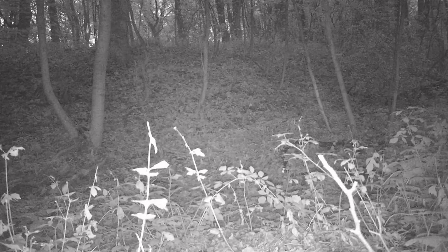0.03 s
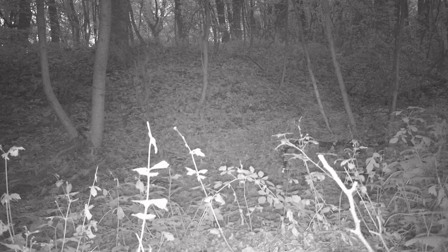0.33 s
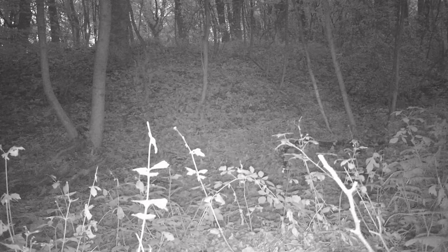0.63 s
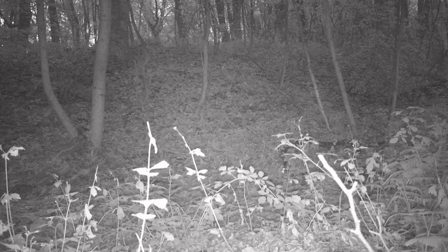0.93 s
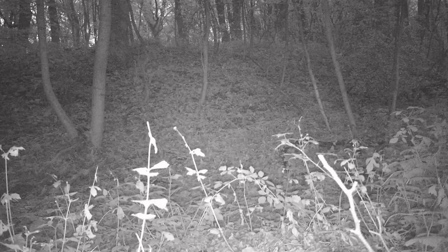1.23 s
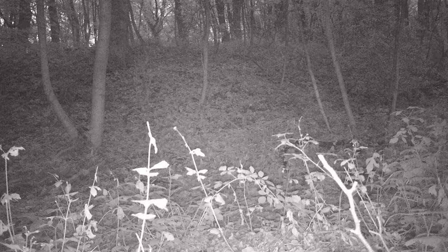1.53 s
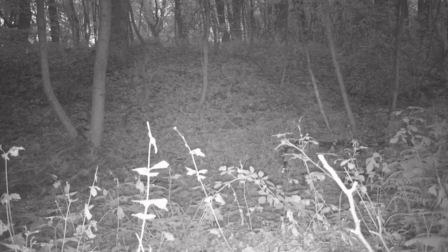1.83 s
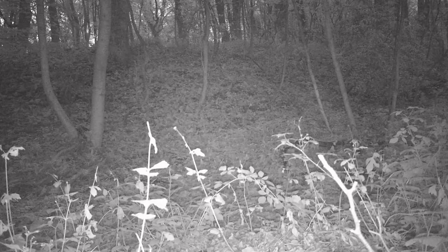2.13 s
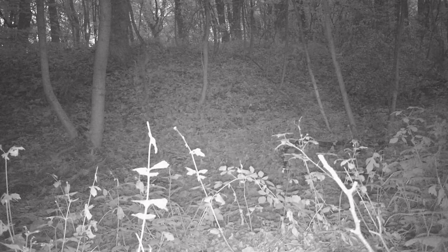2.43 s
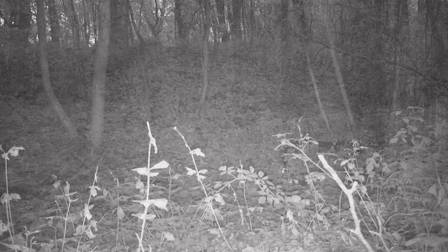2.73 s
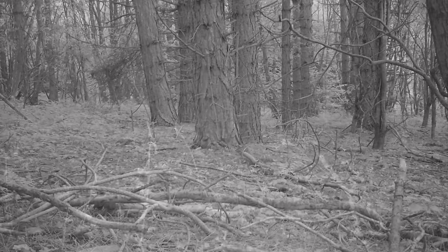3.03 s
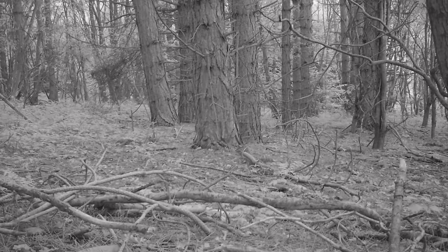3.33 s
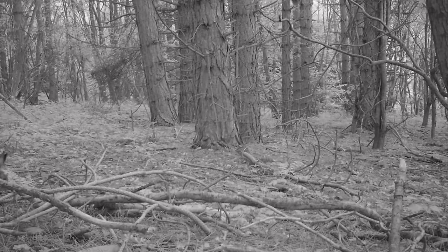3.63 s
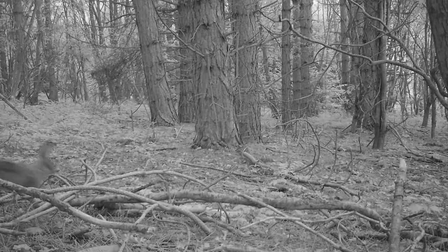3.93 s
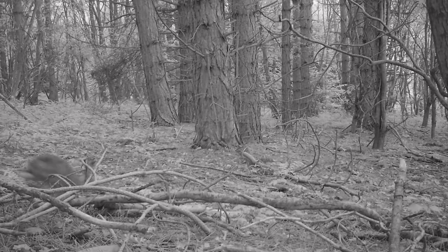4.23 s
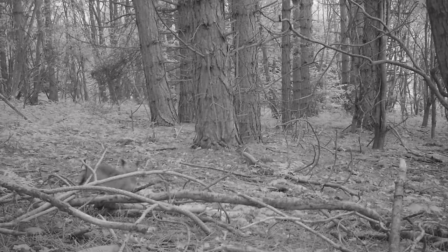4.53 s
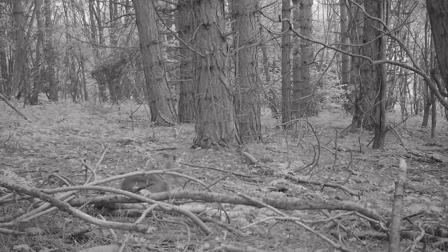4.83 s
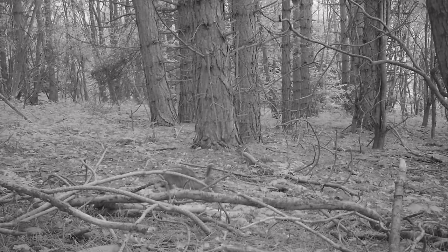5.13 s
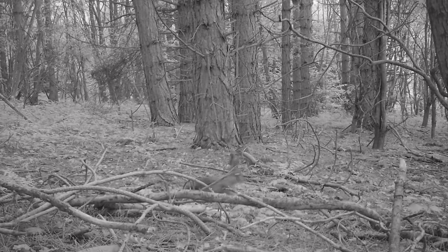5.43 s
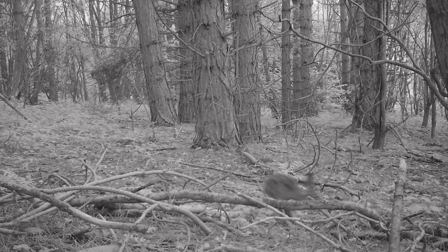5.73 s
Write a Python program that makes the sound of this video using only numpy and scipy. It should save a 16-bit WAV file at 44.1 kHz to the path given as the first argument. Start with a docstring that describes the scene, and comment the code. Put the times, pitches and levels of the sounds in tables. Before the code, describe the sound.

Steady dull microphone hiss and low woodland air rumble with a faint electronic throb, broken by one click before distant road noise joins.

```python
"""A trail camera in the woods

Microphone hiss lies over a low rumble of air while the camera's electronics throb and chirr five times
a second. Two scenes play, overlapping for a moment. The first has a soft sighing and one low bump.
The second switches on with a jump in voltage, heard as a click, and adds the roar of a far road.
The camera's filters make it all sound hollow and dull."""
import sys
import numpy as np
from scipy import signal
from scipy.fft import rfft, irfft
from scipy.io import wavfile
from scipy.ndimage import uniform_filter1d

SR = 44100
rng = np.random.default_rng(int(sys.argv[2]) if len(sys.argv) > 2 else 0)


def output_pcm(signal):
    """Save a mono or channel-first signal as 16-bit PCM at the path in sys.argv[1].

    Samples are clipped to [-1, 1] before scaling.
    """
    pcm = np.clip(np.atleast_2d(signal).T, -1, 1) * 32767
    wavfile.write(sys.argv[1], SR, np.round(pcm).astype(np.int16))


N = 258867
SECOND_START_S, FIRST_END_S = 2.3463, 4.0463

# Air rumbling among the trees. Each row: frequency in Hz, starting level in dB per Hz.
AIR_SPECTRUM = [(4, -71), (16, -62), (30, -67.5), (55, -78.5), (80, -81.5), (110, -86), (160, -76),
                (220, -96.5), (500, -120)]
# The microphone's hiss. Each row: frequency in Hz, starting level in dB per Hz.
HISS_SPECTRUM = [(20, -88), (200, -88), (300, -93), (450, -97), (630, -96), (800, -100), (1300, -103.2),
                 (2000, -105.3), (4000, -108.3), (6000, -110.1), (7000, -111.5), (7700, -113.6),
                 (8300, -120.6), (8900, -130), (11000, -122), (15700, -113.7)]
# A soft, far-off sigh. Each row: frequency in Hz, starting level in dB per Hz.
SIGH_SPECTRUM = [(850, -118), (1150, -103.5), (1300, -105), (1650, -118)]
# The sigh's swells. Each row: peak time in seconds, boost in dB, seconds to fade by 20 dB.
SIGH_SWELLS = [(.15, 2.5, 0.4), (.85, 1.5, 0.7)]
# The rumble of far engines. Each row: frequency in Hz, starting level in dB per Hz.
ENGINE_SPECTRUM = [(4, -67), (18, -60.5), (32, -68), (55, -68), (70, -73), (88, -74.7), (110, -81),
                   (160, -95), (300, -120)]
# The engines grow louder and softer. Each row: time in seconds, boost or cut in dB.
ENGINE_SWELLS = [(2.4, -1.5), (2.7, 2.5), (3.2, 0.5), (3.9, -3), (4.4, 0.5), (4.55, -3), (4.8, 4),
                 (5.2, 0.5), (5.45, 1.5), (5.8, -1.5)]
# The rush of far tyres. Each row: frequency in Hz, starting level in dB per Hz.
TYRE_SPECTRUM = [(600, -120), (800, -104), (935, -98), (1008, -90.4), (1080, -99.5), (1350, -107.5),
                 (2000, -122)]
# Where the electronics ring. Each row: frequency in Hz, width in Hz, starting level in dB per Hz.
WHINE_PEAKS = [(3700, 400, -115), (4470, 200, -109), (5110, 165, -100), (5720, 150, -110),
               (6850, 200, -111)]
# The fine sizzle of a burst of current. Each row: frequency in Hz, starting level in dB per Hz.
SIZZLE_SPECTRUM = [(5500, -128), (6400, -118), (7600, -117.5), (8400, -126)]
# The low thud of a burst of current. Each row: frequency in Hz, starting level in dB per Hz.
THUD_SPECTRUM = [(10, -71.5), (28, -60.5), (55, -73), (85, -74), (120, -85), (160, -76.5), (220, -90.5),
                 (350, -97.5), (700, -110)]
# The first scene's thuds are uneven. Each row: time in seconds, boost or cut in dB.
THUD_ACCENTS = [(.16, 0), (.36, -2.5), (.56, 3.5), (.76, 2.5), (1.15, -3), (1.35, -3), (1.55, 3),
                (1.75, -3), (1.95, 0.5), (2.14, 3.5)]
# Bands that the camera turns down. Each row: centre in Hz, width in Hz, depth in dB.
CAMERA_NOTCHES = [(157.9, 184, -23), (633, 680, -22), (5000, 6000, -9.8), (10000, 3000, -3),
                  (14500, 5000, -4)]


def undb(db):
    """Turn decibels into a number to multiply by."""
    return 10 ** (np.asarray(db) / 20)


def shaped_noise(gains):
    """Noise with its own strength at each frequency."""
    return irfft(rfft(rng.standard_normal(N)) * gains, N) * np.sqrt(SR / 2)


def coloured_noise(spectrum):
    """Noise that follows a spectrum table and has nothing above its last frequency."""
    hz, db = np.transpose(spectrum)
    freqs = np.fft.rfftfreq(N, 1 / SR)
    levels_db = np.interp(np.log(freqs + 1), np.log(hz), db, right=-np.inf)
    return shaped_noise(undb(levels_db))


def waver(rate_hz, depth_db):
    """A multiplier that wanders around 1: random steps, smoothed twice."""
    hold = int(SR / rate_hz)
    steps = rng.standard_normal(N)[np.arange(N) // hold]
    smooth = uniform_filter1d(uniform_filter1d(steps, hold), hold)
    return undb(depth_db * smooth / smooth.std())


def fading_step(since, settle_s):
    """A sudden jump from 0 to 1 that sinks back again."""
    return (since >= 0) * np.exp(-np.maximum(since, 0) / settle_s)


def air():
    """A low rumble that wavers as the air moves."""
    return coloured_noise(AIR_SPECTRUM) * waver(rate_hz=16, depth_db=0.93)


def hiss():
    """The microphone and its amplifier make a steady hiss."""
    return coloured_noise(HISS_SPECTRUM)


def sigh(t, rise_s=.15):
    """A far-off rushing swells twice, rising quickly and dying away more slowly."""
    level = 0
    for peak_s, db, fade_s in SIGH_SWELLS:
        rise = np.clip(1 + (t - peak_s) / rise_s, 0, 1)
        level += rise * undb(db - 20 * np.maximum(t - peak_s, 0) / fade_s)
    return coloured_noise(SIGH_SPECTRUM) * level


def far_road(t):
    """The wood lets through only the engines' bass, one engine's firing note and the rush of tyres."""
    pitch_hz = 59 * waver(rate_hz=6, depth_db=0.37)
    note = np.sqrt(2) * np.sin(2 * np.pi * np.cumsum(pitch_hz) / SR)
    drone = undb(-57) * waver(rate_hz=5, depth_db=2) * note
    swell = undb(np.interp(t, *np.transpose(ENGINE_SWELLS)))
    engines = (coloured_noise(ENGINE_SPECTRUM) + drone) * swell
    tyres = coloured_noise(TYRE_SPECTRUM) * waver(rate_hz=8, depth_db=0.5)
    return engines + tyres


def end_tick(t):
    """The first scene stops with a tiny step, heard as a faint, bright tick."""
    return -undb(-58.5) * fading_step(t - FIRST_END_S, settle_s=.01)


def bump(t, at_s=.9435, width_s=.0023):
    """One short, smooth pulse, heard as a soft low bump."""
    return undb(-36.5) * np.exp(-((t - at_s) / width_s) ** 2 / 2)


def current_bursts(since_burst, period_s=.198, rise_s=.015, fall_s=.026):
    """The electronics draw current in regular bursts that rise quickly and fall a little slower."""
    from_peak = (since_burst + period_s / 2) % period_s - period_s / 2
    width_s = np.where(from_peak < 0, rise_s, fall_s)
    return np.exp(-(from_peak / width_s) ** 2 / 2)


def electronics(since_burst, chirr_gain_db, thud_gain_db):
    """Each burst of current whines, sizzles and leaks into the microphone's power as a low thud."""
    freqs = np.fft.rfftfreq(N, 1 / SR)
    peaks = sum(undb(db) / (1 + (2 * (freqs - hz) / width) ** 2) for hz, width, db in WHINE_PEAKS)
    chirr = shaped_noise(peaks) + coloured_noise(SIZZLE_SPECTRUM)
    chirr *= waver(rate_hz=150, depth_db=1.5)  # a rough flutter
    thud = coloured_noise(THUD_SPECTRUM)
    return current_bursts(since_burst) * (undb(chirr_gain_db) * chirr + undb(thud_gain_db) * thud)


def switch_on_click(t):
    """The microphone's voltage jumps at once, then leaks away through a capacitor."""
    return undb(-21.2) * fading_step(t - SECOND_START_S, settle_s=.12)


def scene():
    """The first scene runs on under the second, so for a while there are two layers of hiss."""
    t = np.arange(N) / SR
    first_burst_s, second_burst_s = .160, 2.392
    accents_db = np.interp(t, *np.transpose(THUD_ACCENTS))
    first = hiss() + air()
    first += electronics(t - first_burst_s, chirr_gain_db=-0.5, thud_gain_db=accents_db)
    first += sigh(t) + bump(t)
    second = hiss() + air()
    second += electronics(t - second_burst_s, chirr_gain_db=-3.5, thud_gain_db=-0.5)
    second += far_road(t)
    first_on = np.clip((FIRST_END_S - t) / .004, 0, 1)
    second_on = t >= SECOND_START_S
    return (first * first_on + second * second_on + switch_on_click(t))[None]


def record(dry):
    """The camera's filters hollow out the hiss and make the click ring briefly."""
    dull_hz, cutoff_hz, cutoff_width_hz, top_hz = 2700, 7450, 2700, 16000
    s = 1j * np.fft.rfftfreq(2 * N, 1 / SR)  # frequency, in the form that filter formulas use
    treble_slope = dull_hz / (s + dull_hz)
    ringing_low_pass = cutoff_hz ** 2 / (s ** 2 + s * cutoff_width_hz + cutoff_hz ** 2)
    response = treble_slope * ringing_low_pass
    for hz, width, db in CAMERA_NOTCHES:
        response *= (s ** 2 + s * width * undb(db) + hz ** 2) / (s ** 2 + s * width + hz ** 2)
    filtered = irfft(rfft(dry, 2 * N) * response)[:, :N]
    tick = end_tick(np.arange(N) / SR)  # skips the filters above, so it stays bright
    steep_top_cut = signal.ellip(8, .2, 70, top_hz, fs=SR, output="sos")
    return signal.sosfilt(steep_top_cut, filtered + tick)


dry = scene()
out = record(dry)
output_pcm(out)
```